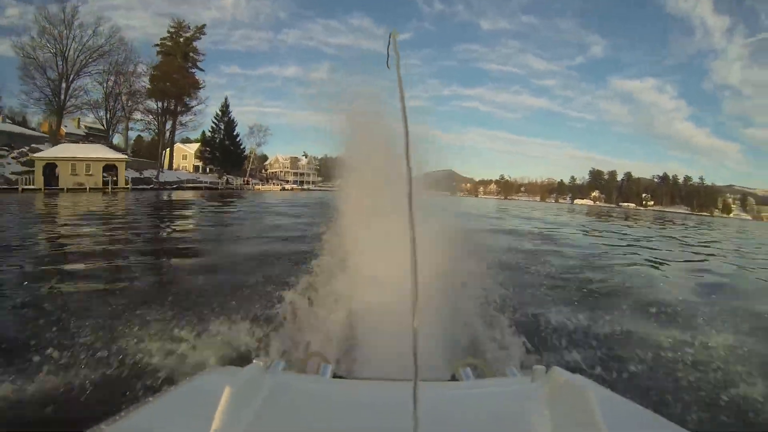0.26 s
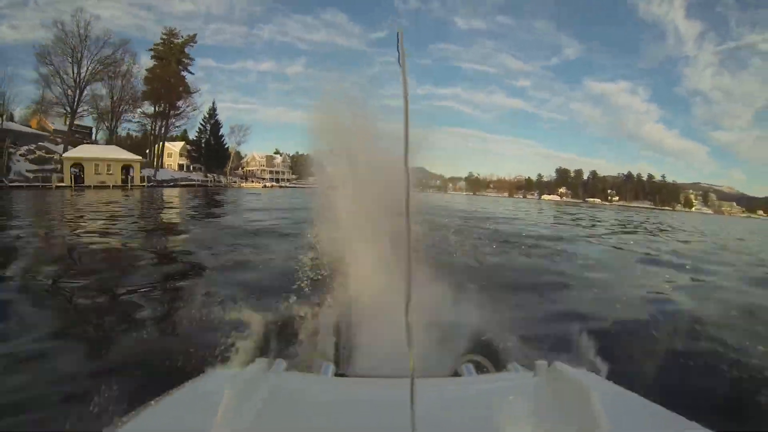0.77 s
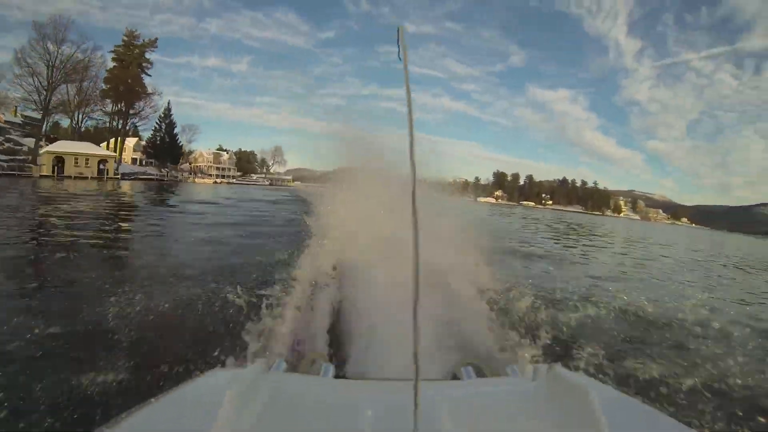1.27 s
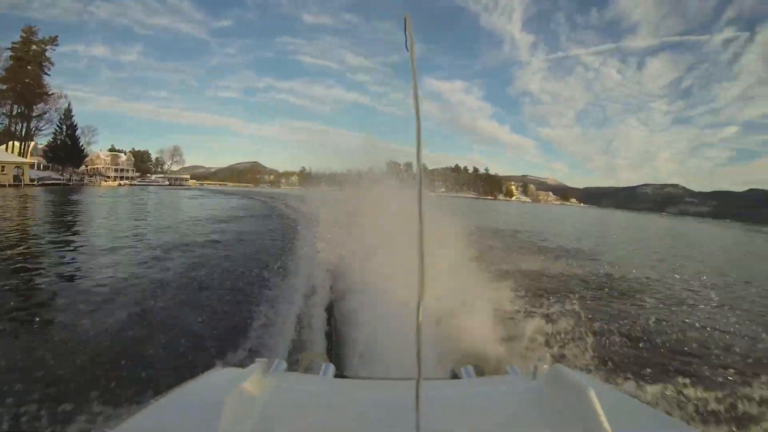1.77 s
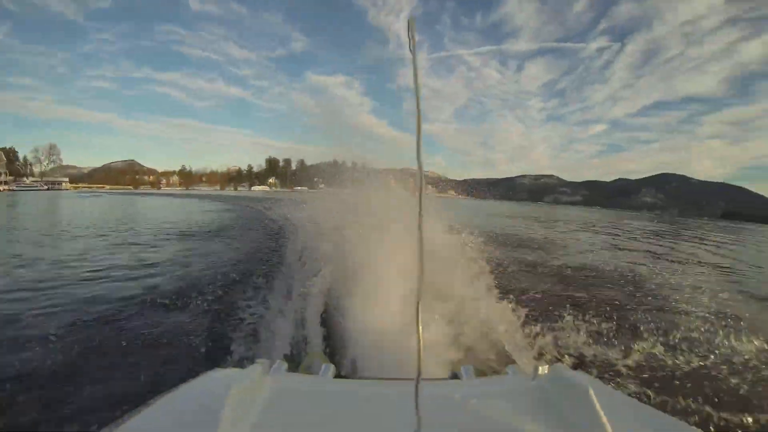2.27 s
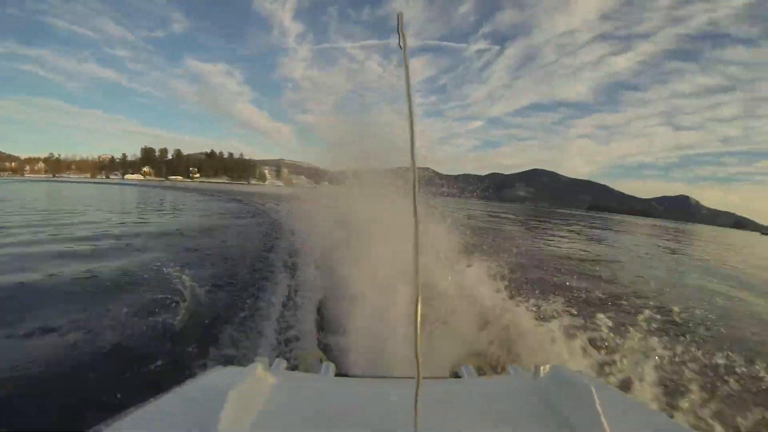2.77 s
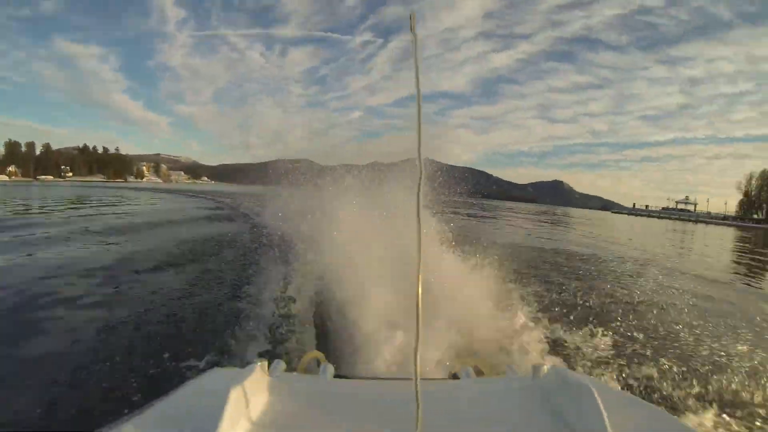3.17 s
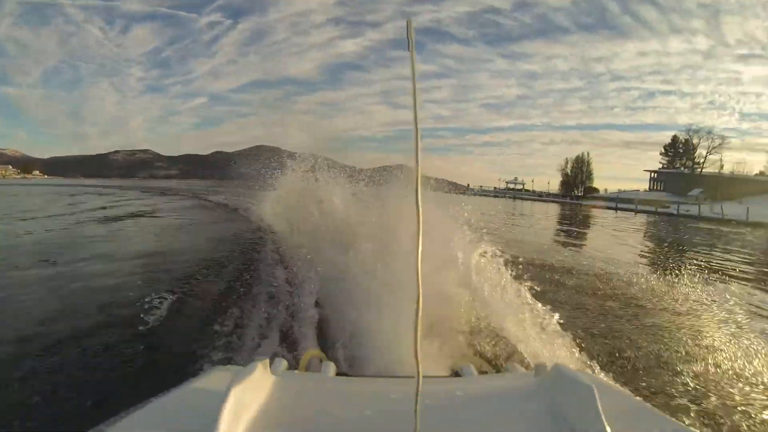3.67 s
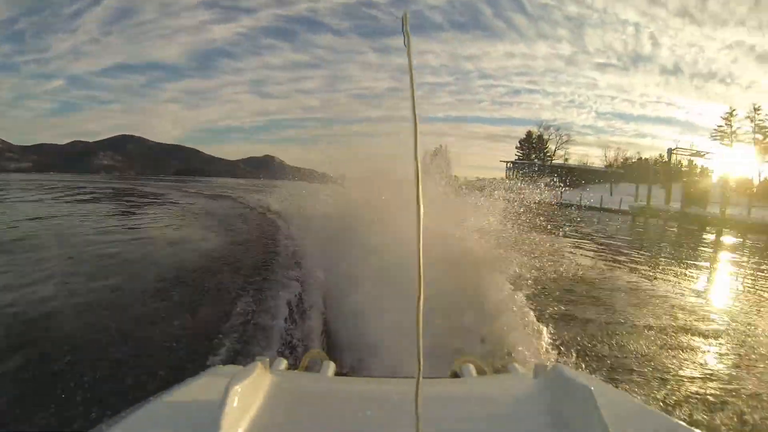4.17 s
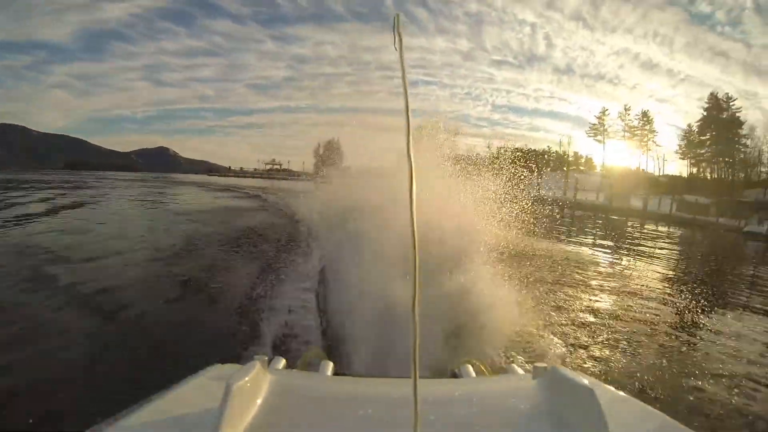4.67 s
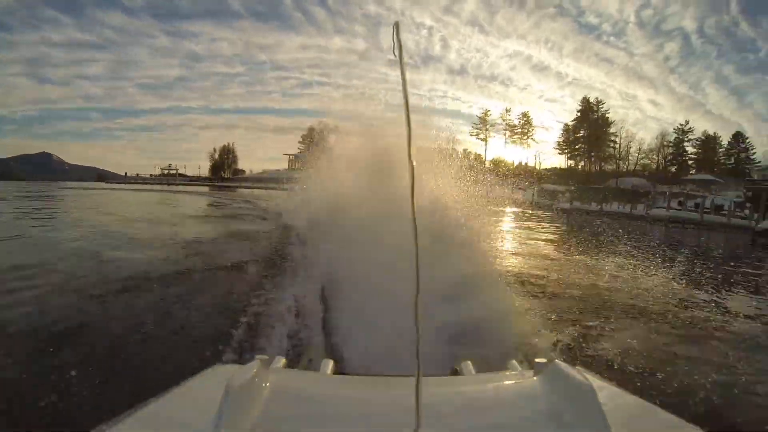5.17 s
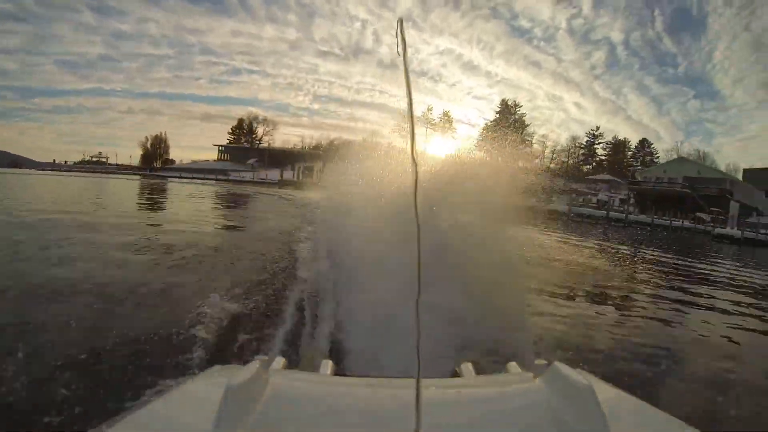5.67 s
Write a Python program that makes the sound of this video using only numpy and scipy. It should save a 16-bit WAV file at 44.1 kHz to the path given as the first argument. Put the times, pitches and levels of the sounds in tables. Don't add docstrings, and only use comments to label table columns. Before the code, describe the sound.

Close, mono and slightly squashed: a nasal engine whine fused with buzzing plastic walls, a hissy latch whirr and sharp fine ticks. Early bounces bring dull booms and a quick rev flare. The speed then drops, holds low and uneven through a turn on the lake, and rises smoother at the end, with low water thuds and muffled spray throughout.

```python
import sys
import numpy as np
from scipy import signal
from scipy.fft import rfft, irfft
from scipy.io import wavfile
from scipy.ndimage import uniform_filter1d

SR = 44100
rng = np.random.default_rng(int(sys.argv[2]) if len(sys.argv) > 2 else 0)


def linear_from_db(decibels):
    return 10 ** (np.asarray(decibels, float) / 20)


def to_wav(s):
    ch = np.atleast_2d(s).T
    pcm = np.round(np.clip(ch, -1, 1) * 32767)
    wavfile.write(sys.argv[1], SR, pcm.astype(np.int16))


N = 261027


def rms_one(x):
    return x / np.sqrt(np.mean(x ** 2) + 1e-20)


def in_time(rows):
    s, *columns = np.transpose(rows)
    return [np.interp(np.arange(N) / SR, s, c) for c in columns]


def bumps(rows, order=2):
    s, length, *columns = np.transpose(rows)
    coarse = np.arange(0, N + 32, 32)
    bells = np.exp(-((coarse / SR - s[:, None]) / (np.abs(length[:, None]) + 0.0012)) ** order)
    return [np.interp(np.arange(N), coarse, c @ bells) for c in columns]


def at_hz(points, hz):
    curve_hz, curve_db = np.transpose(points)
    return np.interp(np.log(hz), np.log(curve_hz), curve_db)


def drift(rate_hz):
    r = np.exp(-40 * np.pi * rate_hz / SR)
    noise = rng.standard_normal(N // 20 + 2002)
    slow = signal.lfilter([1], [1, -2 * r, r * r], noise)[2000:]
    return np.interp(np.arange(N) / 20, np.arange(len(slow)), rms_one(slow))


def coloured(x, spectrum):
    hz = np.arange(4097) * SR / 8192 + 1e-3
    cepstrum = irfft(np.log(linear_from_db(at_hz(spectrum, hz))))
    cepstrum[1:4096] *= 2
    cepstrum[4097:] = 0
    impulse = irfft(np.exp(rfft(cepstrum)))
    return rms_one(signal.fftconvolve(x, impulse)[:N])


def crank(flutter):
    # (time [s], speed [turns/s])
    load_curve = [(0, 243), (.22, 242), (.3, 236), (.48, 232), (1.0, 228), (1.2, 222), (1.36, 196),
                  (1.8, 181), (2.2, 172), (3.31, 171), (3.45, 179), (3.7, 173), (4.19, 181), (4.41, 186),
                  (4.62, 178), (4.83, 188), (4.97, 208), (5.92, 221)]
    # (time [s], leap [turns/s], length [s], knock [dB])
    hops = [(.484, -5, 0.02, -17), (0.536, 14, 0.034, -3), (0.639, -9, 0.039, 2.5), (0.733, 25, 0.036, 9),
            (1.594, 3, .1, 0), (2.187, -3, 0.029, 5), (2.397, 4.5, .08, 1.5), (2.699, 2.5, 0.087, 0.5),
            (2.905, -4, 0.0377, 3.5), (4.302, -5, .04, -1), (5.349, 5, .22, 0.5), (5.587, -3.5, 0.049, -2)]
    per_s, = in_time(load_curve)
    grip_db = np.zeros(N)
    for s, leap, length, knock_db in hops:
        hop = np.exp(-((np.arange(N) / SR - s) / length) ** 2)
        per_s = per_s + leap * hop
        grip_db += knock_db * hop
    per_s = per_s * (1 + flutter / 100 * drift(11))
    return per_s, np.cumsum(per_s) / SR, grip_db


def loaded_down(per_s):
    return np.clip((198 - per_s) / 18, 0, 1)


def partial(turns, order, waver_db, start):
    waver = start + .14 * order ** .5 * drift(20)
    return np.sqrt(2) * linear_from_db(waver_db * drift(17.0)) * np.cos(2 * np.pi * order * turns + waver)


def exhaust_note(turns, per_s, buzz_db):
    # (frequency [Hz], level [dB])
    path = [(470, -43), (850, -6), (1090, -10.5), (1210, -3.5), (1320, -2), (1410, 5), (1540, 3.5),
            (1750, -5), (1900, -1.5), (2060, -10.5), (2200, -22.5), (2420, -12.5), (2600, -9.5),
            (3000, -33)]
    # (multiple of the turn rate [1], level [dB])
    puff = [(5, -4.5), (6, 2), (7, 0.5), (8, 2), (9, -2), (11, 1.5), (16, 0.5)]
    # (time [s], note over buzz [dB], extra of its top [dB])
    steadiness = [(0, -8, 5), (.2, -4.5, 4), (.45, -1.5, 1), (.6, -8, 3.5), (1.25, -6.5, 3.5), (1.5, -7, 5),
                  (2.0, -7, -1), (4.2, -2.5, -1), (4.35, -5, 7.5), (4.8, -5.5, 8.5), (4.95, -4, 5),
                  (5.3, -4, 0.5), (5.92, -2, 6.5)]
    over_buzz_db, top_db = in_time(steadiness)
    burst = np.pi * np.arange(17) - .3 * (np.arange(17) - 7) ** 2
    note = np.zeros(N)
    for k in range(5, 17):
        hz = k * per_s
        level_db = at_hz(path, hz) + at_hz(puff, k) + top_db * (hz > 2250)
        note += linear_from_db(level_db) * partial(turns, order=k, waver_db=3.5, start=burst[k])
    evened = note / np.sqrt(uniform_filter1d(note ** 2, size=12000) + 1e-12)
    strong_weak = 1 + 0.12 * drift(13) * np.cos(np.pi * turns)
    return linear_from_db(buzz_db + over_buzz_db) * evened * strong_weak


def mount_knock(turns, per_s, grip_db, drive_db, rattle_db):
    # (frequency [Hz], level [dB])
    mounts = [(340, -41), (430, -44.5), (485, -39.5), (550, -37.5), (630, -50.5), (698, -36), (730, -46),
              (900, -39)]
    # (middle [s], half length [s], knock [dB], extra per multiple [dB])
    seated = [(.2, 0.36, 12.5, -0.5), (.55, 0.039, 7, 0.5), (.85, 0.021, 4, -1), (1.11, 0.034, 5, -1.5),
              (1.65, 0.2, 5, -1), (2.1, 0.096, -2, -2.5), (2.26, 0.069, 4.5, 6), (2.43, 0.048, -5, 1),
              (2.63, .14, 2.5, 5), (3.07, 0.081, 3.5, 2.5), (3.3, .1, 5, 4.5), (3.72, 0.047, 6, 2),
              (3.9, 0.055, -8.5, 15), (4.19, 0.065, -3, 8), (4.31, 0.048, 6, 6.5), (4.68, 0.12, 0, 4.5),
              (5.68, 0.3, 6, 2.5)]
    pressed_db = 0.47 * rattle_db + 0.51 * (drive_db + 16)
    seated_db, tilt_db = bumps(seated, order=6)
    knock = np.zeros(N)
    for k in (2, 3, 4):
        level_db = at_hz(mounts, k * per_s) + grip_db + pressed_db + seated_db + (k - 3) * tilt_db
        start = rng.uniform(0, 2 * np.pi)
        knock += linear_from_db(level_db + .5) * partial(turns, order=k, waver_db=2.8, start=start)
    return knock


def hull_shake(turns, bounce):
    # (time [s], length [s], change [dB])
    skips = [(.32, 0.061, -13), (.41, 0.022, -12), (.56, .03, -15), (.8, 0.027, -9), (1.27, 0.1, 2),
             (1.44, .1, -3.5), (1.6, 0.014, -5.5), (1.7, 0.0063, -14), (1.81, 0.0066, -9), (1.93, .02, -7),
             (2.06, 0.0073, -14), (2.22, 0.027, -17), (2.32, 0.017, -11), (2.39, 0.011, -21),
             (2.47, .015, -5), (2.54, .02, -17), (2.72, 0.057, -10), (2.98, 0.022, -11), (3.14, 0.029, -6),
             (3.28, 0.029, -4.5), (3.43, .015, -5), (3.53, 0.015, -6), (3.66, 0.011, -14),
             (3.77, 0.037, -6), (3.98, .02, -5), (4.29, 0.015, -6), (4.45, .02, -3), (4.61, .012, -16),
             (4.75, 0.014, -7), (5.31, .02, -1.5)]
    light_loss_db = 14 * np.maximum(bounce - 0.21, 0)
    shake_db = -15 - light_loss_db + bumps(skips)[0]
    wobble = np.sqrt(1 - bounce ** 2) + bounce * (drift(21.3) + 1j * drift(9.8)) / np.sqrt(2)
    return np.sqrt(2) * linear_from_db(shake_db) * np.real(wobble * np.exp(2j * np.pi * turns))


def camera_grip():
    # (time [s], drive from the deck [dB], looseness of the camera [dB])
    deck = [(0, -14.5, -42.5), (.45, -15.5, -46), (.95, -16.5, -54.5), (1.22, -14.5, -54), (1.3, -24, -55),
            (1.47, -24, -59), (1.6, -18.5, -54.5), (1.9, -19.5, -50.5), (2.05, -15, -45.5),
            (3.3, -16.5, -44), (3.5, -19, -48), (3.75, -17.5, -44.5), (3.96, -19.5, -50),
            (4.2, -18.5, -45.5), (4.83, -17, -47), (4.88, -25.5, -60.5), (5.3, -20, -57),
            (5.92, -20.5, -55)]
    # (time [s], length [s], rattle [dB], buzz [dB])
    jolts = [(.262, 0.012, -7, -0.5), (.36, 0.0098, -5, -2), (.455, 0.014, -10, 1), (.505, 0.015, 8.5, 0),
             (.565, .02, 5.5, 2.5), (.62, 0.029, -8, 2), (.655, 0.0098, 11.5, 5.5), (.705, 0.028, -8, -1.5),
             (.755, 0.03, 8, 2), (.835, .02, 4, 1.5), (.882, .014, -6, 2.5), (.915, .013, 12.5, 5),
             (1.17, 0.022, 9, -2.5), (1.53, .025, 7, 2), (1.65, 0.014, 6, 4), (1.83, 0.016, 8, 2.5),
             (2.06, 0.011, 8.5, 1), (2.14, 0.0057, -12, -5.5), (2.26, 0.034, 5.5, 1.5),
             (2.33, 0.013, -6, -1.5), (2.55, 0.007, 7, 7), (2.78, 0.0076, -9, 5.5), (2.88, 0.017, 7.5, 2.5),
             (2.98, 0.037, -7.5, -3), (4.25, 0.012, -13, -0.5), (4.33, 0.034, 3, 2.5),
             (4.47, 0.11, -4.5, -2.5), (4.65, .02, 5, -1.5), (4.73, .012, -9, -5), (5.33, .03, 2.5, 1)]
    drive_db, loose_db = in_time(deck)
    rattle_db, extra_db = bumps(jolts)
    return drive_db, rattle_db, drive_db + extra_db, loose_db + rattle_db


def contacts(turns, at, spread_db, dies_s):
    luck = rng.standard_normal((int(turns[-1]) + 2, 2))
    hit = np.flatnonzero(np.diff(np.floor(turns - at)) > 0)
    late = (np.abs(luck[:len(hit), 0]) * .0001 * SR).astype(int)
    clicks = np.zeros(N)
    clicks[np.minimum(hit + late, N - 1)] = linear_from_db(spread_db * np.clip(luck[:len(hit), 1], -2, 2))
    return rms_one(signal.lfilter([1], [1, -np.exp(-1 / (dies_s * SR))], clicks))


def rattle(beat, steady, patches_db, body, level_db):
    chatter = rng.standard_normal(N) * (steady + beat) * linear_from_db(patches_db)
    return linear_from_db(level_db) * coloured(chatter, body)


def wall_buzz(turns, buzz_db):
    # (frequency [Hz], density [dB/Hz])
    walls = [(590, -42.5), (1000, -24), (1180, -23), (1350, -2), (1450, 1.5), (1670, -8.5), (1970, -14),
             (2140, -24), (2570, -14.5), (2940, -24), (3820, -24), (4160, -37.5), (4400, -50), (5720, -59),
             (9680, -120)]
    beat = contacts(turns, .3, spread_db=3.5, dies_s=.0022)
    return rattle(beat, .8, 1.2 * drift(30), walls, buzz_db - 5.5)


def latch_whirr(turns, per_s, tick_db, skipping):
    # (frequency [Hz], density [dB/Hz])
    hiss = [(2530, -22.5), (4300, -10), (4560, -5), (4930, -8.5), (5340, -3.5), (6120, -12), (6600, -25),
            (8580, -33.5), (14500, -120)]
    # (frequency [Hz], density [dB/Hz])
    own_note = [(4300, -37), (5050, -3), (5280, 1.5), (5550, -1), (5900, -10.5), (6400, -53), (9000, -100)]
    ringing = loaded_down(per_s)
    whirr_db = -46.5 + 4.5 + .8 * (tick_db + 46.5) + 3.5 * ringing
    knocks = contacts(turns, 0.93, spread_db=2.0, dies_s=0.0029)
    whirr = rattle(knocks, 1.0, 1.5 * skipping, hiss, whirr_db + 0.32 - 6.4 * ringing)
    return whirr + ringing * rattle(knocks, 0.12, 2.6 * skipping, own_note, whirr_db - 3.5)


def hard_tick(turns, tick_db, skipping):
    # (frequency [Hz], density [dB/Hz])
    hard_parts = [(5500, -31.5), (6590, -21), (7100, -17.5), (8300, 3), (8880, -8), (9350, -3.5),
                  (10700, -10.5), (11300, -13.5), (11900, -9.5), (12750, -8.5), (13300, -18), (14000, -17),
                  (15000, -39.5), (16000, -73)]
    beat = contacts(turns, .8, spread_db=1.5, dies_s=.0013)
    return rattle(beat, .45, 4.8 * np.minimum(skipping, .6), hard_parts, tick_db - .4)


def slaps():
    # (time [s], peak [dB], ring [Hz])
    landings = [
        (0.549, -13, 60.6),
        (0.742, -8, 158),
        (.90, -22, 70.1),
    ]
    out = np.zeros(N)
    t = np.arange(int(.12 * SR)) / SR
    for s, peak_db, hz in landings:
        boom = linear_from_db(peak_db) * t / 0.031 * np.exp(1 - t / 0.006) * np.sin(2 * np.pi * hz * t)
        out[int(s * SR):int(s * SR) + len(t)] += boom
    return out


def water(bounce, buzz_db):
    # (time [s], length [s], thud over the chop [dB])
    waves = [(0, 0.014, 24), (.13, .02, 3), (.35, .12, 0), (.55, 0.057, 15), (.77, 0.023, 14),
             (.9, 0.065, 9), (1.2, .05, 13), (1.7, 0.16, 11), (2.0, .05, 17), (2.4, .12, 12),
             (2.73, .05, 13), (2.95, .06, 14), (3.22, .06, 8), (3.58, .06, 2), (3.93, .09, 7),
             (4.35, .08, 7), (4.78, 0.091, 8)]
    # (frequency [Hz], density [dB/Hz])
    thud_body = [(8.8, -39), (15, 2.5), (31, 3), (59, -31), (87, -7.5), (114, -15.5), (130, -30),
                 (170, -34.5), (290, -120)]
    # (frequency [Hz], density [dB/Hz])
    spray = [(60, -2.5), (120, -10), (200, 18.5), (300, -10), (420, -8), (600, -1.5), (800, -5),
             (1000, 1.5), (1300, -3), (2500, -47), (5000, -93.5)]
    thud_db = -43.5 + 16.5 * bounce + bumps(waves)[0]
    wash_db = -28.5 + 1.03 * (buzz_db + 16.5) + 2.9 * drift(17)
    thuds = linear_from_db(thud_db - 4.0) * coloured(rng.standard_normal(N), thud_body)
    wash = linear_from_db(wash_db) * coloured(rng.standard_normal(N), spray)
    return thuds + wash


def scene():
    # (time [s], unsteadiness of the shake [0-1], flutter of the revs [%])
    ride = [(0, .9, .3), (.45, .9, .25), (.6, .6, .7), (.9, .7, .7), (1.15, .15, .3), (1.9, .2, .4),
            (2.2, .3, .5), (3.8, .28, .5), (4.0, .15, .5), (4.75, .25, .6), (4.95, .05, .2),
            (5.92, .05, .15)]
    bounce, flutter = in_time(ride)
    per_s, turns, grip_db = crank(flutter)
    drive_db, rattle_db, buzz_db, tick_db = camera_grip()
    engine = exhaust_note(turns, per_s, buzz_db)
    engine += mount_knock(turns, per_s, grip_db, drive_db, rattle_db)
    engine += hull_shake(turns, bounce)
    skipping = drift(62)
    case = wall_buzz(turns, buzz_db)
    case += latch_whirr(turns, per_s, tick_db, skipping)
    case += hard_tick(turns, tick_db, skipping)
    return (engine + case + slaps() + water(bounce, buzz_db))[None, :]


def top_cut(x):
    return signal.sosfilt(signal.butter(12, 15380, fs=SR, output="sos"), x)


def record(dry):
    rounded = 1.416 * np.tanh(dry / 1.216)
    cut = signal.sosfilt(signal.butter(7, 14400, fs=SR, output="sos"), rounded)
    closing = np.minimum(1, np.arange(N)[::-1] / (.004 * SR))
    return top_cut(cut * closing)


dry = scene()
out = record(dry)
to_wav(out)
```